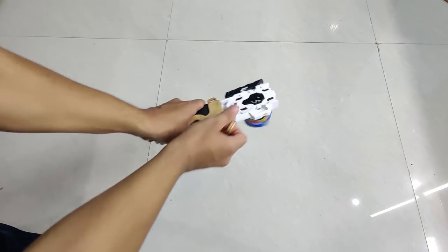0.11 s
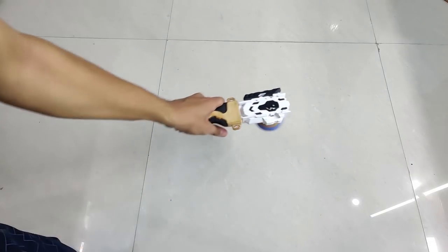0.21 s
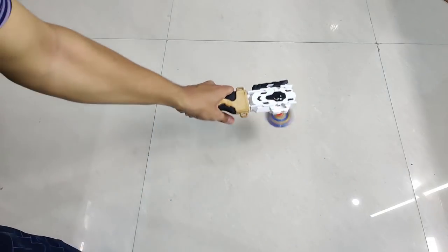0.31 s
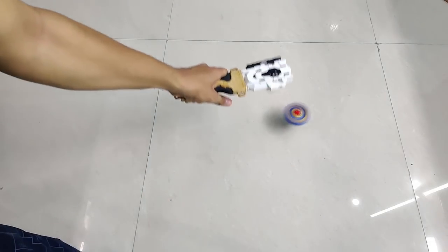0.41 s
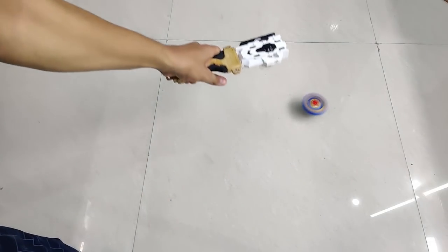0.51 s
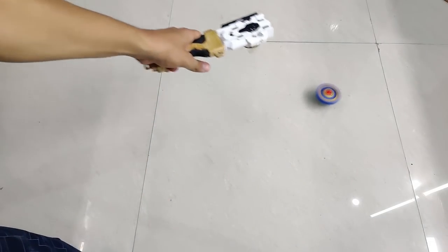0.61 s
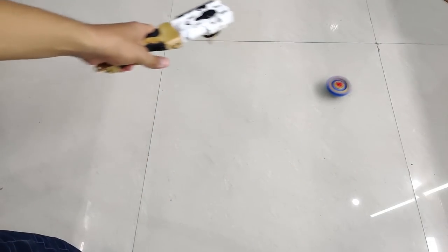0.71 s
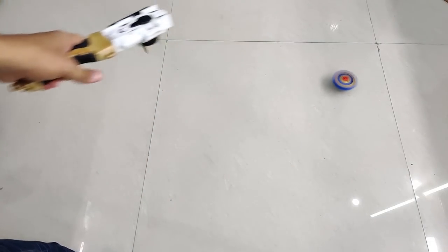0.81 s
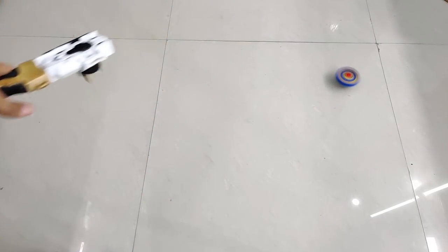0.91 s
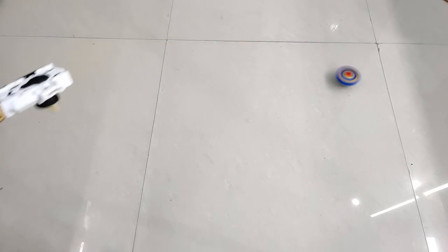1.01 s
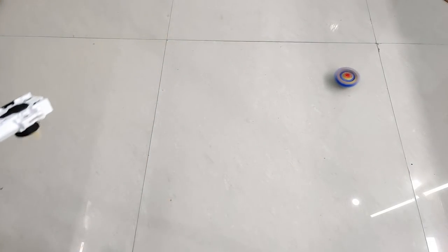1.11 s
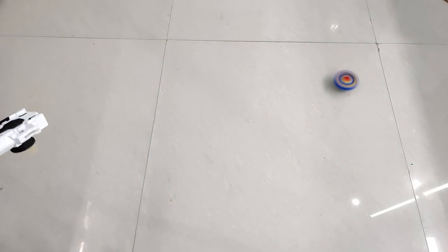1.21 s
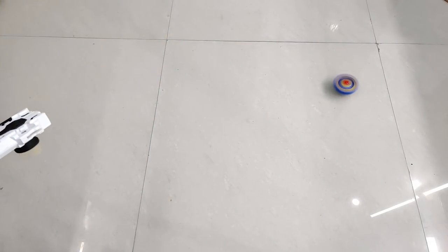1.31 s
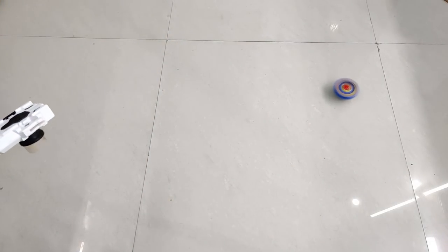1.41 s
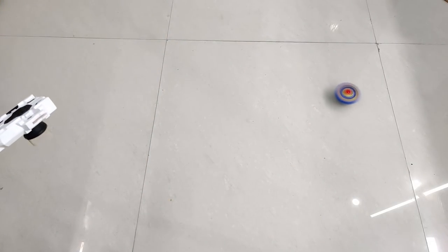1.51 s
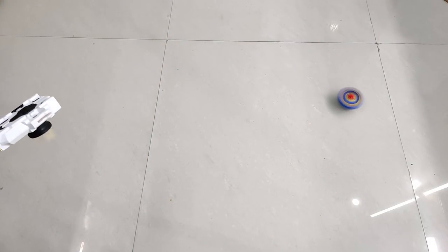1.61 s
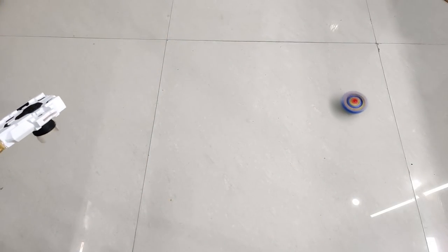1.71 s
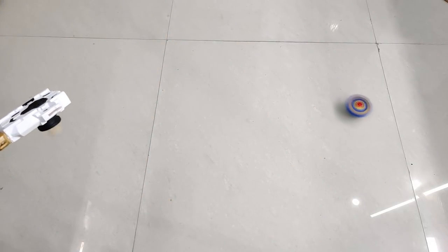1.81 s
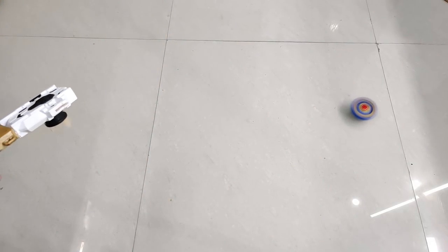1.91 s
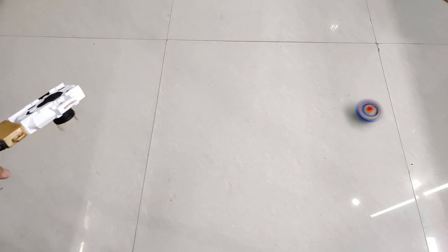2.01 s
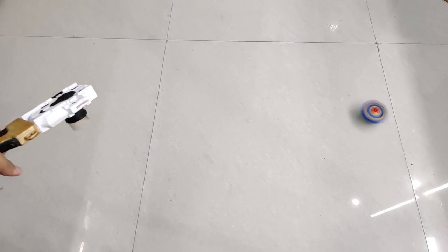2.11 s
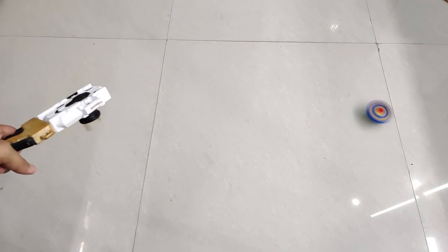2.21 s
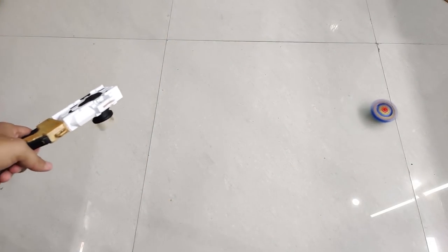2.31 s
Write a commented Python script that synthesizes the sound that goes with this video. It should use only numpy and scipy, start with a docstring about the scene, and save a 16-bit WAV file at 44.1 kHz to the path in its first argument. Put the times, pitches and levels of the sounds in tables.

```python
"""A low hum with rumble and faint hiss, then a toy top is ripped off its geared plastic launcher on a tile floor.
The gears are trains of uneven clicks that race with the pull; after the release they slow, fade and cut out.
Snags, release, landing and bounces are short noise cracks; the freed top rings briefly in flight.
On the tile it skitters, then whirrs: noise rings its shell and scrapes at the tip, hardest once a turn.
The hard room adds early reflections and a longer reverberation."""
import sys
import numpy as np
from scipy import signal
from scipy.fft import rfft, irfft, next_fast_len
from scipy.io import wavfile
from scipy.ndimage import map_coordinates

SR = 44100
rng = np.random.default_rng(int(sys.argv[2]) if len(sys.argv) > 2 else 0)


def output_pcm(signal):
    """Save a mono or channel-first signal as 16-bit PCM at the path in sys.argv[1].

    Samples are clipped to [-1, 1] before scaling.
    """
    pcm = np.clip(np.atleast_2d(signal).T, -1, 1) * 32767
    wavfile.write(sys.argv[1], SR, np.round(pcm).astype(np.int16))


N = 105840

# slow swell of the hum: start_s, level_db
HUM_SWELL = [(0, -53), (.15, -51.5), (.25, -50), (.42, -53.5), (.55, -53), (.67, -49), (.85, -48),
             (1.6, -47.5), (2.4, -48)]
HUM_HZ, LOW_HUM_HZ = 199.9, 96.2
LOW_HUM_DB, RUMBLE_DB = -13.5, -7  # relative to the hum
# colour of the rumble under the hum: freq_hz, level_db
RUMBLE_COLOUR = [(20, -6), (35, -15), (52, 0.5), (70, -4.5), (95, -11), (125, -12.5), (300, -22),
                 (600, -31), (1500, -54)]
# colour of the room hiss: freq_hz, level_db
AIR_COLOUR = [(150, -11), (300, 3), (500, 0.5), (900, 2.5), (1200, -2.5), (1450, -3), (2300, -13),
              (2900, -7), (4000, -6.5), (4850, -4.5), (5500, -17.5), (9000, -19.5), (15500, -24)]
AIR_DB = -55.5
# colour of the pulling arm's low rush: freq_hz, level_db
THUMP_COLOUR = [(20, -2), (45, -2), (90, -10), (300, -44), (2000, -90)]
THUMP_S, THUMP_LENGTH_S, THUMP_DB = .33, 0.057, -45  # centre, spread and peak of the rush

# reverberation time by band: freq_hz, t60_s
ROOM_DECAY = [(200, 0.32), (1500, 0.67), (5000, 0.42), (10000, 0.23), (15000, 0.13)]
EARLY_T60_S = 0.087  # reflections off the floor and near objects
STILL_SHARE = .7  # share of the reverberant power that answers steadily; the rest keeps changing

# effort of the pull on the launcher, before gain and judder: start_s, level_db
PULL_EFFORT = [(0.15, -74), (0.168, -73.5), (0.18, -51.5), (0.238, -34), (0.324, -25), (0.424, -23.5),
               (0.43, -30)]
RIP_DB, JUDDER_DB = 2, 1.3  # gain on the pull; unevenness of the pull
TEETH_HZ, TEETH_DB_PER_DOUBLING = 1497.8, 15.5  # nominal tooth rate at full pull; level gained when it doubles
# gear colour early in the pull: freq_hz, level_db
SLOW_GEAR_COLOUR = [(150, -17), (560, -8), (1300, -12), (1850, -6.5), (2400, -1), (3100, -3.5), (4200, -2),
                    (5300, 3.5), (6200, 0), (7800, 3.5), (9300, -1.5), (10600, -6), (13000, -7),
                    (15500, -3.5)]
# gear colour at full speed: freq_hz, level_db
FAST_GEAR_COLOUR = [(100, -15.5), (300, -8.5), (560, -10), (820, 4), (1150, -13), (1800, 2.5), (2500, -1.5),
                    (3100, 1), (5000, 3.5), (6800, 2.5), (8500, 3.5), (9700, 0), (11000, -1), (13000, 3.5),
                    (15500, 5)]
FAST_FROM_S, FAST_BY_S = .25, 0.35  # crossfade from slow to fast colour
CREAK_S, CREAK_RISE_S, CREAK_DB = 0.153, 0.025, -50.5  # the top's shell rubs in its seat as the pull begins
RELEASE_S, RELEASE_FADE_S = .428, 0.0029
# gear colour after the release: freq_hz, level_db
COAST_COLOUR = [(300, -26), (1200, -9), (2500, -4), (4500, 4), (7000, 2.5), (9500, -3.5), (12000, -2.5),
                (14200, 5.5), (15500, 6.5)]
COAST_DB, COAST_FALL_DB_PER_S = -34, 5.5  # level at the release, then its fall
COAST_STOP_S, COAST_FADE_S = 1.02, .05

# ratchet snags, release, landing and bounces: start_s, level_db, brightness_db_per_octave
KNOCK_HITS = [(.197, -36, -4), (0.297, -17, 4.5), (0.34, -5.5, 7), (.36, -22, -3), (0.4361, -13, -3.5),
              (.5255, -15, -1.5), (.5315, -16.5, -1), (.545, -20, -4), (.558, -8, 1.5), (.621, -13, 0.5)]
# colour of the plastic crack before its brightness tilt: freq_hz, level_db
KNOCK_COLOUR = [(150, -30), (600, -12), (1000, -10), (1450, 0.5), (2400, -2), (3300, -10), (4700, -1),
                (7500, -3), (10000, -8.5), (15500, -5.5)]
KNOCK_T60_S = .012  # decay of the crack before colouring

RELEASE_RING_HZ, RELEASE_RING_WIDTH_HZ = 1500, 480
RELEASE_RING_T60_S, RELEASE_RING_DB = 0.26, -37.5
DIP_S, DIP_END_S, DIP_DB, DIP_HZ = .432, .517, -10, 736  # the bass dips briefly after the release

# resonances of the top's shell: freq_hz, width_hz, level_db
SHELL_MODES = [(1535, 168, -1), (1654, 177, -5), (1890, 169, -1.5)]
# the tip on the tile, before the two gains: start_s, shell_ring_level_db, scrape_level_db
TIP_CONTACT = [(.53, -22.5, -30), (.56, -45.5, -30), (.6, -35, -36), (.63, -41.5, -31.5), (.74, -40, -37.5),
               (.79, -50, -41), (1.0, -49.5, -46), (1.14, -48.5, -45.5), (1.26, -34, -45),
               (1.345, -42, -42), (1.41, -44, -46.5), (1.47, -43.5, -46.5), (1.545, -42.5, -44),
               (1.6, -51.5, -46), (1.85, -51.5, -47.5), (2.27, -53.5, -49.5), (2.35, -46, -50),
               (2.4, -48, -51.5)]
RING_DB, SCRAPE_DB = -3, -0.28  # gains on the ring and the scrape
LAND_S, SPIN_HZ, SPIN_LOSS_HZ_PER_S = .525, 80.8, 2.58  # spin rate at the landing, then its loss
# colour of the scrape: freq_hz, level_db
SCRAPE_COLOUR = [(200, -15), (600, -14), (1000, -6.5), (1500, -9.5), (2000, -1), (2500, -0.5), (3100, 1),
                 (3600, -3), (4300, 1), (5200, -2.5), (6800, -10.5), (10000, -13.5), (15500, -18)]
# colour of the spinning tip's fine hiss: freq_hz, level_db
HISS_COLOUR = [(1000, -30), (4000, -13), (6000, 0.5), (8000, -15), (10000, -7), (12500, -4), (14200, 6),
               (15500, 0.5)]
HISS_DB, HISS_FALL_DB_PER_S = -46, 4  # level at the landing, then its fall
# the top wanders, on top of its fixed offset: start_s, left_minus_right_db
TOP_WANDER = [(.55, 1), (.8, 5.5), (1.2, 5), (1.6, 4), (2.2, 4.5)]

TOP_HZ = 15850  # upper band limit of the whole scene


def amp(db):
    """Decibels to gain."""
    return 10 ** (np.asarray(db) / 20)


def unit(x):
    """Scales x to rms 1."""
    return x / np.sqrt(np.mean(x ** 2) + 1e-20)


def clock():
    """The time of every sample in seconds."""
    return np.arange(N) / SR


def along(points, hz):
    """Reads (freq_hz, value) points on a log frequency axis."""
    f, v = np.transpose(points)
    return np.interp(np.log(hz + 1), np.log(f + 1), v)


def curves(rows):
    """One value per sample for each column after the time."""
    s, *cols = np.transpose(rows)
    return [np.interp(clock(), s, c) for c in cols]


def ramp(start, length):
    """Rises from 0 to 1 over length seconds."""
    return np.clip((clock() - start) / max(length, 1e-4), 0, 1)


def wobble(rate):
    """A smooth random curve, rate knots a second."""
    knots = rng.standard_normal(int(N * rate / SR) + 4)
    return map_coordinates(knots, [clock() * rate])


def add(out, start, x):
    """Mixes x into out from a sample on."""
    out[..., start:start + x.shape[-1]] += x[..., :N - start]


def filtered(x, response):
    """Filters x by a complex response of frequency, padded so tails do not wrap round."""
    n = x.shape[-1]
    m = 2 * next_fast_len(n // 2 + 2048, True)
    return irfft(rfft(x, m) * response(np.fft.rfftfreq(m, 1 / SR)), m)[..., :n]


def coloured(x, points, tilt_db=0):
    """Filters x causally to a (freq_hz, level_db) shape, tilted per octave about 3 kHz."""
    def response(hz):
        level_db = along(points, hz) + tilt_db * np.log2((hz + 200) / 3000)
        cepstrum = irfft(np.log(amp(level_db)))
        # folding the cepstrum forward in time gives minimum phase
        cepstrum[1:len(cepstrum) // 2] *= 2
        cepstrum[len(cepstrum) // 2 + 1:] = 0
        return np.exp(rfft(cepstrum))
    return filtered(x, response)


def background():
    """Two slowly drifting hum tones, low rumble, faint hiss and the pulling arm's low rush."""
    t = clock()
    [hum_db] = curves(HUM_SWELL)
    main_tone = np.sin(2 * np.pi * HUM_HZ * t + 0.038 * wobble(4.3))
    low_tone = np.sin(2 * np.pi * LOW_HUM_HZ * t + 0.23 * wobble(5.55))
    hum = np.sqrt(2) * (main_tone + amp(LOW_HUM_DB) * low_tone)

    def noise(shape, apart):
        """Coloured stereo noise; apart sets how much the sides differ."""
        shared = rng.standard_normal(N)
        return unit(coloured(shared + apart * rng.standard_normal((2, N)), shape))

    low = amp(hum_db) * (hum + amp(RUMBLE_DB) * noise(RUMBLE_COLOUR, apart=0.45))
    swell = np.exp(-((t - THUMP_S) / THUMP_LENGTH_S) ** 2)
    thump = amp(THUMP_DB) * swell * noise(THUMP_COLOUR, apart=0.46)
    air = amp(AIR_DB) * noise(AIR_COLOUR, apart=1.0)
    return (low + thump + air) * amp([[1.9], [-1.9]])  # leans left


def walls(x):
    """The steady part of the reverberation: x through stereo noise dying at each band's own rate."""
    hz, t, z = signal.stft(rng.standard_normal((2, SR // 2)), SR, nperseg=256)
    decay = amp(-60 * t / along(ROOM_DECAY, hz)[:, None])
    tail = signal.istft(z * decay, SR, nperseg=256)[1]
    return signal.fftconvolve(x[None], tail / np.linalg.norm(tail[0]), axes=1)[:, :N]


def in_room(x, pan_db, lag_ms, early_db, wet_db):
    """Direct sound on two sides, scattered echoes that keep changing, and the walls' steady answer."""
    sides = np.array([[1], [-1]])
    direct = filtered(x, lambda f: np.exp(-1j * np.pi * f * sides * lag_ms / 1000))
    hz, t, z = signal.stft(x, SR, nperseg=256)
    power = np.abs(z) ** 2

    def linger(band_power, t60):
        """Lets power die by 60 dB in t60 seconds."""
        keep = amp(-120 * t[1] / t60)  # per frame; twice the dB because this is power
        return signal.lfilter([0, 1 - keep], [1, -keep], band_power)

    tail = np.array([linger(band, t60) for band, t60 in zip(power, along(ROOM_DECAY, hz))])
    early = amp(early_db) ** 2 * linger(power, EARLY_T60_S)
    echo = np.sqrt(early + (1 - STILL_SHARE) * amp(wet_db) ** 2 * tail)
    chance = signal.stft(rng.standard_normal((2, N)), nperseg=256)[2]
    diffuse = signal.istft(echo * chance / chance.std(), nperseg=256)[1][:, :N]
    steady = np.sqrt(STILL_SHARE) * amp(wet_db) * walls(x)
    return amp(sides * pan_db / 2) * (direct + diffuse + steady)


def shell(x):
    """x rings the top's shell; each resonance acts twice for steep flanks."""
    def response(f):
        total = 0
        for k, (centre, width, db) in enumerate(SHELL_MODES):
            damping = 2j * f * width
            mode = damping / (centre * centre - f * f + damping)
            total = total + amp(db) * mode ** 2 * (-1) ** k  # neighbours have opposite polarity
        return total
    return filtered(x, response)


def teeth(rate_hz, scatter_db, rub):
    """One uneven click for each gear tooth, with rubbing noise between the clicks."""
    passed = np.floor(np.cumsum(rate_hz * np.exp(.2 * wobble(700))) / SR)
    strength = amp(scatter_db * rng.standard_normal(N)) * rng.choice([-1, 1], N)
    clicks = np.diff(passed, prepend=0) * strength
    return unit(unit(clicks / np.sqrt(rate_hz)) + rub * rng.standard_normal(N))


def launcher():
    """Tooth clicks race, louder and brighter with the pull, then slow and fade once the top is free."""
    [pull_db] = curves(PULL_EFFORT)
    rate_hz = TEETH_HZ * 2 ** ((pull_db - pull_db.max()) / TEETH_DB_PER_DOUBLING)
    clicks = teeth(rate_hz, scatter_db=3, rub=1.0)
    fast_clicks = teeth(np.full(N, TEETH_HZ), scatter_db=3, rub=0.45)
    fast = ramp(FAST_FROM_S, FAST_BY_S - FAST_FROM_S)
    rip = np.sqrt(1 - fast) * unit(coloured(clicks, SLOW_GEAR_COLOUR))
    rip += np.sqrt(fast) * unit(coloured(fast_clicks, FAST_GEAR_COLOUR))
    rip *= amp(pull_db + RIP_DB + JUDDER_DB * wobble(160.9))
    creak = amp(CREAK_DB) * unit(shell(clicks))
    free = ramp(RELEASE_S, RELEASE_FADE_S)
    rip = (rip + creak) * ramp(CREAK_S, CREAK_RISE_S) * (1 - free)

    fall_db = -COAST_FALL_DB_PER_S * (clock() - RELEASE_S)
    coast_rate_hz = TEETH_HZ * 2 ** (fall_db / TEETH_DB_PER_DOUBLING)
    coast = unit(coloured(teeth(coast_rate_hz, scatter_db=8.5, rub=0.77), COAST_COLOUR))
    coast *= amp(COAST_DB + fall_db) * free * (1 - ramp(COAST_STOP_S, COAST_FADE_S))
    placed_rip = in_room(rip, pan_db=3.0, lag_ms=.05, early_db=0.5, wet_db=-4.0)
    return placed_rip + in_room(coast, pan_db=0.0, lag_ms=0.216, early_db=0, wet_db=1.5)


def knocks():
    """Each knock is a short plastic crack: fast-dying noise, coloured and tilted bright or dull."""
    out, age = np.zeros(N), np.arange(SR // 20) / SR
    # sets the level over the crack's effective length, not the whole buffer
    length_gain = np.sqrt(KNOCK_T60_S / age[-1] / np.log(1e6))
    for s, db, bright_db in KNOCK_HITS:
        crack = rng.standard_normal(len(age)) * amp(-60 * age / KNOCK_T60_S)
        hit = unit(coloured(crack, KNOCK_COLOUR, bright_db))
        add(out, round(s * SR), hit * amp(db) * length_gain)
    return in_room(out, pan_db=-0.1, lag_ms=-0.033, early_db=-16, wet_db=1)


def flight():
    """The freed top rings in flight: a band of noise that dies away from the release."""
    age = np.maximum(clock() - RELEASE_S, 0)
    band = lambda hz: 1 / (1 + (2 * (hz - RELEASE_RING_HZ) / RELEASE_RING_WIDTH_HZ) ** 4)
    ring = unit(filtered(rng.standard_normal((2, N)), band))
    return ring * amp(RELEASE_RING_DB - 60 * age / RELEASE_RING_T60_S) * ramp(RELEASE_S + 0.004, .005)


def bass_dip(x):
    """The low end sinks for a moment between the release and the landing."""
    dip = ramp(DIP_S, 0.0043) * (1 - ramp(DIP_END_S, 0.0077))
    bass = filtered(x, lambda hz: 1 / (1 + (hz / DIP_HZ) ** 4))
    return x - (1 - amp(DIP_DB * dip)) * bass


def top():
    """The tip catches the tile's grain, hardest once a turn, and more unevenly where the shell rings louder."""
    ring_db, scrape_db = curves(TIP_CONTACT)
    age = clock() - LAND_S
    turns = np.cumsum(SPIN_HZ - SPIN_LOSS_HZ_PER_S * age) / SR
    lean = np.clip(0.42 + 0.075 * (ring_db - np.median(ring_db)), .1, .65)
    cycle = np.cos(2 * np.pi * turns) + .5 * np.cos(6 * np.pi * turns)
    contact = np.exp(lean * cycle - lean ** 2 / 2)

    def grit(grain_db):
        """Contact noise with a random grain of the given depth."""
        return contact * rng.standard_normal(N) * amp(grain_db * wobble(2500))

    ring = amp(ring_db + RING_DB) * unit(shell(grit(grain_db=8)))
    scrape = amp(scrape_db + SCRAPE_DB) * unit(coloured(grit(grain_db=2), SCRAPE_COLOUR))
    hiss = unit(coloured(rng.standard_normal(N), HISS_COLOUR))
    hiss *= amp(HISS_DB - HISS_FALL_DB_PER_S * age)
    dry_spin = (ring + scrape + hiss) * ramp(LAND_S, 0.006)
    spin = in_room(dry_spin, pan_db=-0.5, lag_ms=-0.26, early_db=-1.5, wet_db=0)
    [pan_db] = curves(TOP_WANDER)
    return spin * amp(np.array([[1], [-1]]) * pan_db / 2)


def scene():
    """Launcher, knocks and top over the hum, with the brief bass dip across them all."""
    return bass_dip(background() + launcher() + knocks() + flight() + top())


def record(dry):
    """Keeps nothing at or above the band limit."""
    return filtered(dry, lambda hz: hz < TOP_HZ)


dry = scene()
out = record(dry)
output_pcm(out)
```